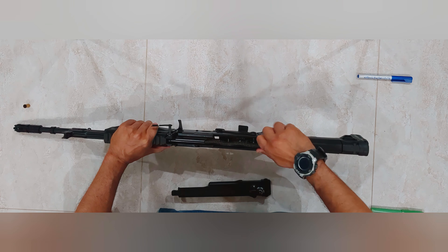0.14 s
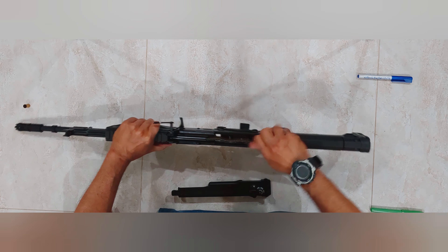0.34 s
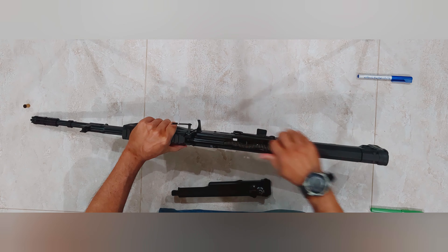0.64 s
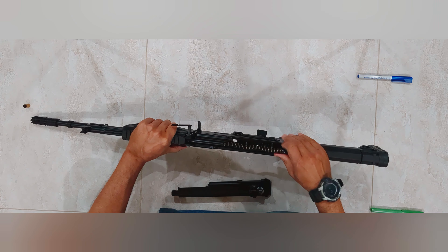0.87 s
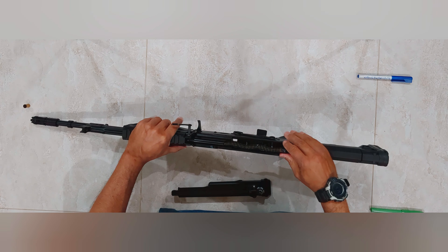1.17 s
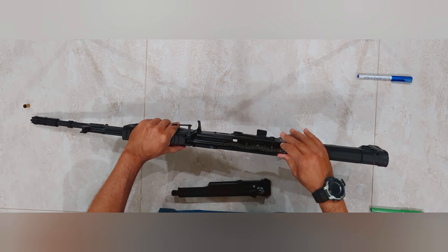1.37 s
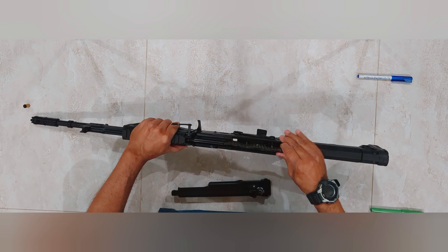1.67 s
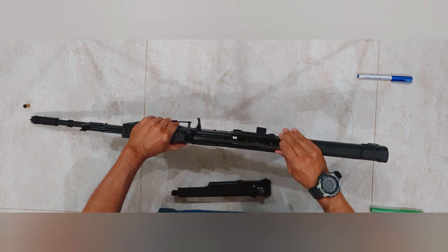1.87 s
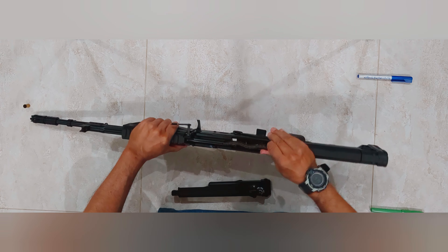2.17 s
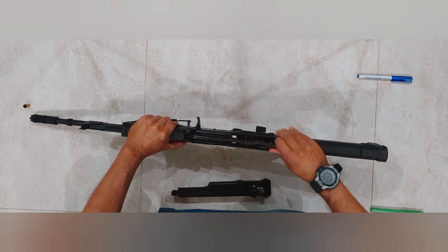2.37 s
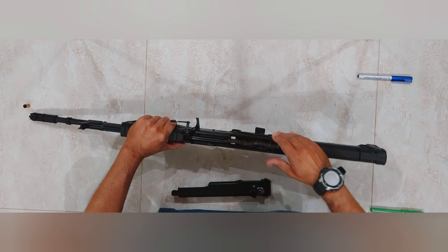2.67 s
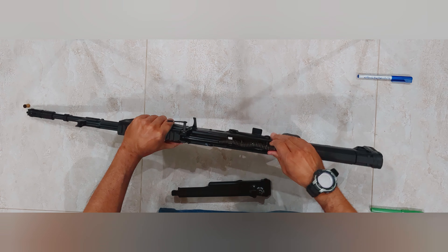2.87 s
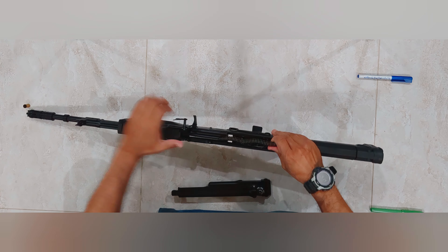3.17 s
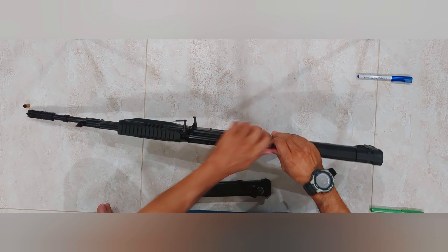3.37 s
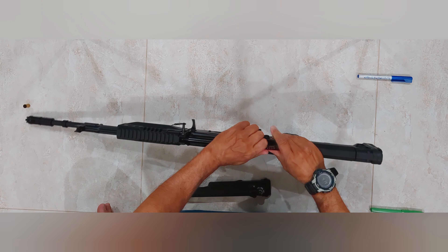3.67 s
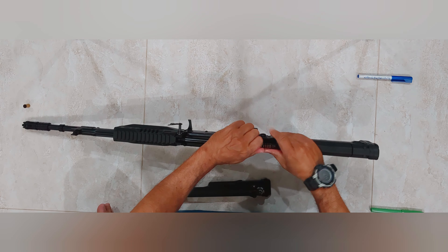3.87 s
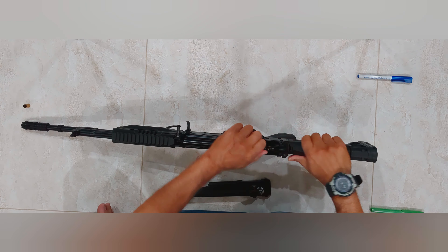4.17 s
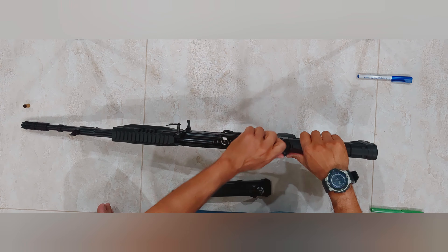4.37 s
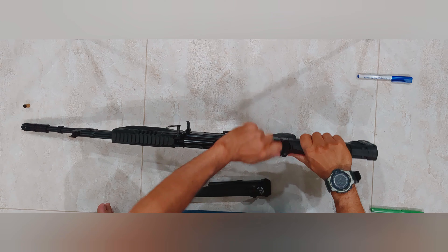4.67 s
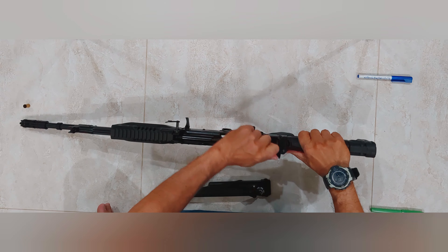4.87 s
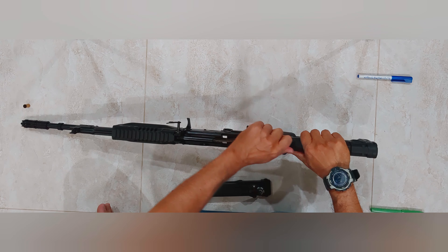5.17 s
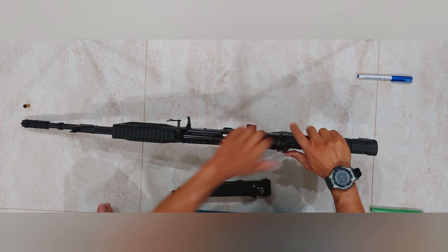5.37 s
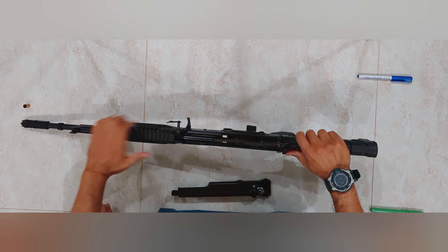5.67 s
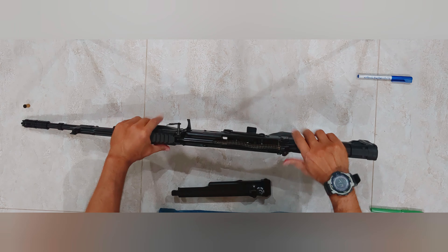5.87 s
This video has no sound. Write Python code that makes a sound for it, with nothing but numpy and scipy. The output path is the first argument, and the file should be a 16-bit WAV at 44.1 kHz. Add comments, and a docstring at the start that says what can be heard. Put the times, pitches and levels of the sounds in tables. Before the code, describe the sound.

Soft dull bumps and faint hand rubbing begin quietly over a low murmur and thin hiss. After two seconds a tight burst of steel clicks and a hard snap ring out. Light ticks follow, then a second run of bright clacks and grinding catches around five seconds, ending in brushing hands and one small click. Bare, bright room with short echoes, mics fairly close.

```python
"""Soft low bumps over a faint hiss and murmur open the scene; then hands slide along a rifle being stripped
on the tiled floor of a bare room. They work the recoil spring: steel parts catch, grind and snap home.
Each contact is a blow plus grinding noise, ringing the modes of the receiver and of the struck part.
Strokes are grainy scrape and smooth skin noise; a bright room answers steel and hands with echoes."""
import sys
import numpy as np
from scipy import signal
from scipy.fft import rfft, irfft, next_fast_len
from scipy.io import wavfile

SR = 44100
rng = np.random.default_rng(int(sys.argv[2]) if len(sys.argv) > 2 else 0)


def unload_wav(signal):
    """Save mono or channel-first audio to the path in sys.argv[1] as 16-bit WAV at rate SR, clipped to [-1, 1]."""
    wavfile.write(
        sys.argv[1],
        SR,
        np.round(np.clip(np.atleast_2d(signal).T, -1, 1) * 32767).astype(np.int16),
    )


N = 265923
TIME = np.arange(N) / SR   # seconds

# Colour of the steady hiss. Each row: frequency in Hz, relative density in dB per Hz.
HISS_COLOUR = [(150, -42.5), (250, -16), (393, -8.5), (686, -18), (971, -11.5), (1420, -14.5), (1640, -8),
               (2050, -12.5), (3060, -17.5), (3840, -14), (4490, -21.5), (6470, -17), (7190, -24.5),
               (12800, -16.5), (16000, -24)]
HISS_DB = -70.5
# Colour of the low murmur. Each row: frequency in Hz, relative density in dB per Hz.
RUMBLE_COLOUR = [(24, -57), (40, -22), (48, -11), (72, -2), (91, 4), (118, 2.5), (194, -1.5), (285, -10.5),
                 (525, -10), (585, -27), (700, -12.5), (910, -63.5), (1540, -120)]
# The gun shifts on the floor. Each row: start in seconds, length in seconds, murmur level in dB before flutter.
FLOOR_SHIFTS = [(0.54, 0.33, -74.5), (1.584, 0.31, -72.5), (1.94, 0.013, -62.5), (2.113, 0.5, -59),
                (2.756, 0.3, -69.5), (3.604, 0.094, -60.5), (3.885, .1, -57), (4.677, 0.68, -59),
                (5.574, 0.033, -58.5), (5.838, 0.22, -64.5)]
SHIFT_ATTACK_S, SHIFT_RELEASE_S, STILL_DB = 0.015, 0.12, -70
RUMBLE_FLUTTER_DB, RUMBLE_FLUTTER_PER_S = 3.5, 30
# Soft low bumps. Each row: time in seconds, level in dB before the left-right balance, pitch in Hz.
LOW_BUMPS = [(0.065, -57.5, 106), (0.097, -51, 80.6), (0.153, -55, 115), (0.195, -50.5, 133),
             (.234, -46, 85), (0.257, -44.5, 102), (0.286, -54, 72), (0.511, -50.5, 102),
             (0.64, -55.5, 87.4), (0.795, -52.5, 109), (1.059, -54.5, 103), (1.384, -49.5, 93.5),
             (1.962, -51, 154), (2.021, -52, 81), (3.141, -53.5, 91.5), (3.249, -50, 102), (3.399, -55, 70),
             (3.779, -50, 190)]
# Strokes of the hands along the gun. Each row: fastest moment in seconds, half length in seconds,
# scrape on steel in dB, skin on the stock in dB (both before the trims in sliding).
HAND_STROKES = [(0.385, 0.027, -67.5, -66), (0.443, 0.015, -53, -57.5), (1.103, 0.17, -79, -96),
                (1.713, 0.023, -66.5, -87), (1.94, 0.02, -64, -96), (2.92, 0.24, -69.5, -83),
                (3.13, 0.047, -61.5, -68), (3.70, 0.12, -65, -72), (4.107, 0.055, -64.5, -53),
                (4.365, 0.3, -67.5, -76.5), (5.593, 0.07, -59, -65.5), (5.843, 0.1, -64.5, -69.5),
                (6.011, 0.087, -59, -63)]
STROKE_RISE, STROKE_FALL = 0.82, 0.56   # shares of the half length
STROKE_ROUNDNESS = 1.32   # 1 = pointed, 2 = bell
RESTING_SCRAPE_DB, RESTING_SKIN_DB = -95, -82   # the hands never lie quite still; before the trims
# Colour of steel scraping. Each row: frequency in Hz, relative density in dB per Hz.
SCRAPE_COLOUR = [(300, -14), (700, -10), (1000, 0), (1600, 2), (2300, -1.5), (3500, -9.5), (5000, -18.5),
                 (8000, -24), (12000, -30), (16000, -19)]
# Colour of skin on the stock. Each row: frequency in Hz, relative density in dB per Hz.
SKIN_COLOUR = [(2000, 2), (4000, 1.5), (7000, 3), (11000, 4.5), (14000, 3), (16000, -0.5)]
# Steel contacts. Each row: start in seconds, strength in dB, weight on the low modes in dB,
# edge on the high modes in dB, grinding time in ms, the struck part's own pitch in Hz,
# the part's level in dB over the strength.
STEEL_CONTACTS = [ (0.4427, -55, -10, 6.5, 4.5, 2940, -1), (0.4672, -44, -21, -17, 0.4, 1600, -17),
                  (0.6513, -59.5, -34, 2, 1.9, 6660, 3.5), (0.695, -60, -33, 3, 19, 3900, -1.5),
                  (0.790, -61, -14, 3.5, 7, 3750, 2.5), (1.706, -64, 1, -24, 3.3, 2910, 4),
                  (1.746, -68, -7, 5, 1.1, 3500, -6), (1.8522, -63.5, 7, -14, 2, 1590, -1),
                  (2.033, -60, -6, -8, 2.2, 905, -1), (2.101, -55, -12, 8, 8.5, 10800, 9),
                  (2.111, -47, -8, -4, 3.4, 12000, 4), (2.1255, -33, -0.5, 1.5, 2.16, 2250, 0),
                  (2.141, -34, -18, -7.5, 4.4, 467, -9), (2.2818, -27.5, -48, -16, 2.9, 6100, -20),
                  (2.2915, -21, -23.5, -16, 0.58, 1840, -14), (2.303, -41, -15, 4, 2.5, 3370, 10),
                  (2.3205, -35, -3.5, -10, 1.1, 1890, 9.5), (2.3615, -46, -30, -22, 2.7, 2040, -5),
                  (2.4305, -32, -16.5, 7, 1.9, 5560, -4.5), (3.135, -46, -19, -17.5, 0.65, 1630, 3),
                  (3.4442, -50, -16, -0.5, 4.9, 3600, 3.5), (3.486, -46, -25, 8.5, 1.15, 11630, 7),
                  (3.6439, -48.5, -14, -7, 4.2, 3560, 1), (3.700, -52, 7, -4.5, 8.8, 730, -6),
                  (3.8803, -34, -9, -17, 3.6, 1390, -8), (4.657, -47, -4.5, -12, 26, 3020, -4),
                  (4.6875, -27, -29, -24.5, 7.3, 3800, -7.5), (4.697, -27.5, -20, -17.5, 7.1, 2870, 1),
                  (4.818, -29.5, -5, -29, 2.1, 2206, 4.5), (4.844, -49, -18.5, -6.5, 5.4, 800, -7),
                  (4.9675, -38, -7, 6.5, 2.8, 10340, 5), (4.981, -26, -18, -15.5, 1.86, 973, -9),
                  (5.0989, -22, -10, -16, 0.8, 2026, 10.5), (5.2675, -38, 1, -16.5, .9, 759, -5.5),
                  (5.9979, -39.5, -18.5, 11.5, 3.3, 1410, -8)]
# Modes of receiver and spring. Each row: pitch in Hz, level in dB, t60 in seconds.
RIFLE_MODES = [ (406, -15.5, 0.008), (502, -14, 0.029), (704, -6, 0.0085), (968.5, -4, 0.06),
               (1280, -2, 0.014), (1517, -3, 0.036), (1856, -1.5, 0.0054), (2150, -1, 0.0045),
               (2201, -1.5, 0.049), (1850, -24.5, .33), (1990, -12, 0.064), (2214, -16, 0.52),
               (2838, -8.5, 0.055), (3104, -11, 0.019), (3410, -12.5, 0.0074), (3554, -8.5, 0.01),
               (4360, -7, 0.0026), (5400, -12, 0.00087), (5500, -14, 0.019), (6266, -6.5, 0.0036),
               (6770, -7.5, 0.00064), (9500, -7, 0.0014), (11390, -5, 0.0035), (12200, -7, 0.0078),
               (15000, -6, 0.00049)]
WEIGHT_FROM_HZ, WEIGHT_FULL_HZ, EDGE_FULL_HZ = 2030, 614, 9530
MAIN_RING_HZ, MAIN_RING_DB, MAIN_RING_OCTAVES = 2060, 4, 0.27
OFF_RING_DB = -3   # for modes that neither weight nor edge favours
# A heavy part stays in touch longer, so its edge tells from a lower pitch on.
# Each row: weight in dB, pitch in Hz where the edge begins. The second row holds above its weight,
# the first row's pitch holds otherwise.
EDGE_START = [(5.5, 3600), (1, 1260)]
# A clean snap reaches the microphone more directly than a grinding catch.
# Each row: grinding time in ms, direct sound in dB.
DIRECT_SHARE = [(1.0, 0.36), (1.9, -1)]
# Decay of the room. Each row: frequency in Hz, t60 in seconds.
ROOM_DECAY = [(200, 0.29), (900, 0.44), (2000, 0.45), (5000, 0.41), (11000, 0.34), (16000, 0.12)]
# Colour of the echoes. Each row: frequency in Hz, relative level in dB.
ROOM_COLOUR = [(200, 1), (900, -0.65), (2000, -1.5), (5000, 1), (11000, -1.4), (16000, -0.74)]
# Left-right likeness of diffuse sound. Each row: frequency in Hz, correlation from -1 to 1.
STEREO_LIKENESS = [(60, 0.95), (200, 0.92), (600, 0.53), (1500, -0.37), (3000, 0.092), (12000, -0.18)]
CUTOFF_HZ = 16100


def from_db(db):
    """Decibels to gain."""
    return 10 ** (np.asarray(db) / 20)


def rms_one(x):
    """Scale to unit rms."""
    return x / np.sqrt(np.mean(x ** 2) + 1e-20)


def at_hz(points, hz):
    """Read a table along log frequency."""
    f, value = np.transpose(points)
    return np.interp(np.log(hz + 1), np.log(f), value)


def add(track, s, sound):
    """Mix a sound in at time s."""
    start = max(int(s * SR), 0)
    part = sound[..., :max(N - start, 0)]
    track[..., start:start + part.shape[-1]] += part


def diffuse(size):
    """Spectrum of white noise reaching two ports from all sides: much alike in the bass only."""
    hz = np.fft.rfftfreq(size, 1 / SR)
    alike = np.clip(at_hz(STEREO_LIKENESS, hz), -1, 1)
    mid, side = rfft(rng.standard_normal((2, size)))
    shared = np.sqrt(1 + alike) * mid
    opposed = np.sqrt(1 - alike) * side * [[1], [-1]]
    return hz, (shared + opposed) / np.sqrt(2)


def noise(colour):
    """Diffuse stereo noise with a given colour, rolled off beyond its table; rms 1."""
    size = next_fast_len(N, True)
    hz, white = diffuse(size)
    low, high = colour[0][0], colour[-1][0]
    skirts = np.minimum(hz / low, 1) ** 2 / np.maximum(hz / high, 1) ** 4
    return rms_one(irfft(white * from_db(at_hz(colour, hz)) * skirts, size)[:, :N])


def hiss():
    """Faint, steady diffuse noise."""
    return from_db(HISS_DB) * noise(HISS_COLOUR)


def rumble():
    """The room's low murmur flutters throughout, swells while the gun shifts on the floor, then dies away."""
    power = from_db(STILL_DB) ** 2
    for s, length_s, db in FLOOR_SHIFTS:
        attack = np.clip((TIME - s) / SHIFT_ATTACK_S, 0, 1)
        release = np.exp(-np.maximum(TIME - s - length_s, 0) / SHIFT_RELEASE_S)
        power = power + (from_db(db) * attack * release) ** 2
    chance = rng.standard_normal(SR)
    flutter = np.interp(TIME * RUMBLE_FLUTTER_PER_S, np.arange(SR), chance)
    return np.sqrt(power) * from_db(RUMBLE_FLUTTER_DB * flutter) * noise(RUMBLE_COLOUR)


def bumps(swell_s=0.0034, right_db=-13.5, left_db=8.0):
    """Dull thumps: brief low tones that swell and die, stronger on the left."""
    out, t = np.zeros(N), TIME[:SR // 10]
    shape = (t / swell_s) ** 2 * np.exp(-t / swell_s)
    shape = shape / shape.max()
    for s, level_db, hz in LOW_BUMPS:
        tone = np.sin(2 * np.pi * hz * t + rng.uniform(0, 2 * np.pi))
        add(out, s - swell_s, from_db(level_db) * shape * tone)
    return out * from_db([[left_db], [right_db]])


def stroke_gains():
    """Each stroke speeds up and slows down again, driving both scrape and skin."""
    power = from_db([[RESTING_SCRAPE_DB], [RESTING_SKIN_DB]]) ** 2
    for s, half_s, scrape_db, skin_db in HAND_STROKES:
        side_s = half_s * np.where(TIME < s, STROKE_RISE, STROKE_FALL)
        speed = np.exp(-(np.abs(TIME - s) / side_s) ** STROKE_ROUNDNESS)
        power = power + from_db([[scrape_db], [skin_db]]) ** 2 * speed
    return np.sqrt(power)


def sliding(grains_per_s=500, grain_db=-2.0, scrape_db=-2.5, skin_db=-1.0):
    """Steel scrapes in tiny random catches; skin brushes the stock smoothly."""
    scrape_gain, skin_gain = stroke_gains()
    caught = rng.random(N) < grains_per_s / SR
    grain_gain = from_db(grain_db * np.minimum(rng.exponential(1, N), 4))
    catches = caught * rng.standard_normal(N) * grain_gain
    colour = from_db(at_hz(SCRAPE_COLOUR, np.fft.rfftfreq(N, 1 / SR)))
    scrape = from_db(scrape_db) * scrape_gain * rms_one(irfft(rfft(catches) * colour, N))
    skin = from_db(skin_db) * skin_gain * noise(SKIN_COLOUR)[0]
    return scrape + skin


def ring(force, hz, t60):
    """One damped mode, of unit energy for a unit click."""
    r, w = from_db(-60 / (t60 * SR)), 2 * np.pi * hz / SR
    mode = signal.lfilter([1, 0, -1], [1, -2 * r * np.cos(w), r * r], force)
    return mode * np.sqrt((1 - r * r) / 2)


def spot_db(hz, strength_db, weight_db, edge_db):
    """How hard a contact drives a mode: a heavy part favours the low modes, a sharp edge the high ones."""
    (_, light_hz), (heavy_above_db, heavy_hz) = EDGE_START
    edge_from_hz = heavy_hz if weight_db > heavy_above_db else light_hz
    low = np.clip(np.log(WEIGHT_FROM_HZ / hz) / np.log(WEIGHT_FROM_HZ / WEIGHT_FULL_HZ), 0, 1)
    high = np.clip(np.log(hz / edge_from_hz) / np.log(EDGE_FULL_HZ / edge_from_hz), 0, 1)
    main = np.exp(-(np.log2(hz / MAIN_RING_HZ) / MAIN_RING_OCTAVES) ** 2)
    favoured_db = weight_db * low + edge_db * high
    return strength_db + favoured_db + MAIN_RING_DB * main + OFF_RING_DB * (1 - low - high)


def contact(touch_db, grind_ms, part_hz, part_db, grit=0.41, grip_share=0.95, glancing_ms=1.9,
            blow=6.2, blow_s=.00006, part_cycles=48, swell_cycles=7.4, spread_db=2.5):
    """A blow, then the faces grind briefly; the receiver rings as the spot allows, the part at its own pitch."""
    t = TIME[:SR // 2]
    t_ms = t * 1000
    pulse = t * np.exp(-t / blow_s)
    rough = rng.standard_normal(len(t)) * rng.exponential(1, len(t))
    grinding = rough * np.exp(-t_ms / max(grind_ms, .1))
    # the longer a contact slides, the more glancing its blow and the slower its grip builds
    grip = 1 - np.exp(-t_ms / max(grip_share * grind_ms, .01))
    glancing_blow = blow / (1 + (grind_ms / glancing_ms) ** 2)
    force = glancing_blow * pulse / pulse.sum() + grit * grip * grinding

    modes = []
    for hz, db, t60 in RIFLE_MODES:
        level_db = db + spot_db(hz, *touch_db) + spread_db * rng.normal()
        modes.append((hz, level_db, t60))
    modes.append((part_hz, touch_db[0] + part_db, part_cycles / part_hz))

    out = np.zeros(len(t))
    for k, (hz, level_db, t60) in enumerate(modes):
        # the blow needs a few cycles to spread through the steel, so each mode swells before it dies
        heard = int((t60 + .05) * SR)
        swell = ring(force[:heard], hz, swell_cycles / hz)
        mode = ring(swell, hz, t60)
        add(out, 0, (-1) ** k * from_db(level_db) * mode / np.linalg.norm(mode))
    return out * np.sqrt(.002 * SR)   # a mode's level is its energy spread over 2 ms


def steel_parts(count=7, channels=3):
    """Each contact radiates a different mix in every direction, one to the microphone and several to the walls."""
    radiated, direct = np.zeros((count, N)), np.zeros(N)
    for k, (s, *touch_db, grind_ms, part_hz, part_db) in enumerate(STEEL_CONTACTS):
        for way in range(channels):
            sound = contact(touch_db, grind_ms, part_hz, part_db)
            add(radiated[(k * channels + way) % count], s, sound / np.sqrt(channels))
        # the last direction also faces the microphone
        direct_db = np.interp(grind_ms, *np.transpose(DIRECT_SHARE))
        add(direct, s, sound * from_db(direct_db))
    return radiated, direct


def two_ports(x, shade_hz=900, lag_s=.00003):
    """The slim gun sends little bass straight ahead; its sound reaches the right port a little sooner."""
    x = signal.sosfilt(signal.butter(1, shade_hz, "high", fs=SR, output="sos"), x)
    return np.array([np.roll(x, round(lag_s * SR)), x])


def room(x, first_echo_s=0.0014, build_s=0.00081, sparse_s=0.0029):
    """Uneven early echoes from floor and walls smooth into a tail, each band dying at its own rate."""
    t = TIME[:SR]
    hz, white = diffuse(SR)
    uneven = np.repeat(rng.normal(-.5, .7, SR), 32)[:SR]   # steps of 32 samples
    lumps = np.exp(np.exp(-t / sparse_s) * uneven)
    onset = (1 - np.exp(-np.maximum(t - first_echo_s, 0) / build_s)) * lumps
    edges, response = np.geomspace(100, SR / 2, 17), 0
    for low, high in zip(edges, edges[1:]):
        centre = np.sqrt(low * high)
        decay = onset * from_db(-60 * t / at_hz(ROOM_DECAY, centre))
        band = irfft(white * ((hz >= low) & (hz < high)), SR)
        level = from_db(at_hz(ROOM_COLOUR, centre))
        response = response + level * band * decay / np.linalg.norm(decay)
    return signal.fftconvolve(x[None], response, axes=1)[:, :N]


def scene(direct_db=0.0, room_db=3.5, rub_room_db=5.0):
    """Gun and hands in the room, over murmur and hiss; every direction has its own pattern of echoes."""
    radiated, direct = steel_parts()
    rub = sliding()
    near = from_db(direct_db) * two_ports(direct + rub)
    steel_echoes = from_db(room_db) * sum(room(beam) for beam in radiated)
    rub_echoes = from_db(rub_room_db) * room(rub)
    return near + steel_echoes + rub_echoes + bumps() + rumble() + hiss()


def record(dry):
    """The top is cut steeply."""
    return signal.sosfilt(signal.ellip(10, .2, 70, CUTOFF_HZ, fs=SR, output="sos"), dry)


dry = scene()
out = record(dry)
unload_wav(out)
```